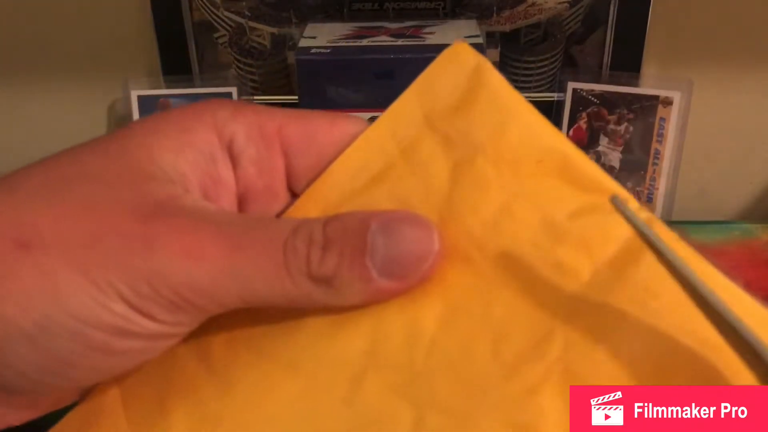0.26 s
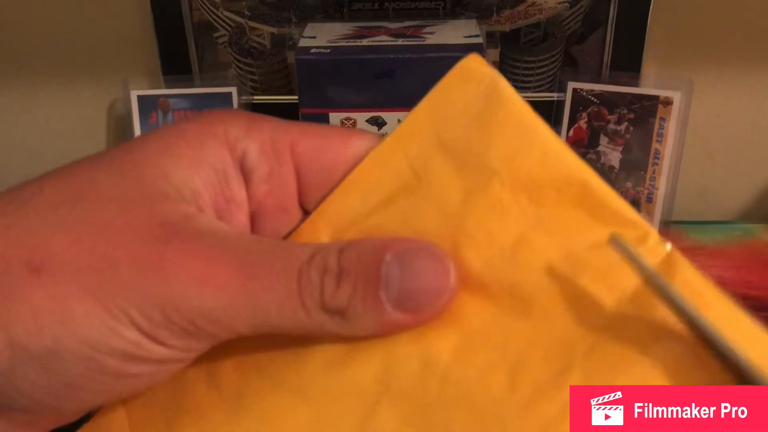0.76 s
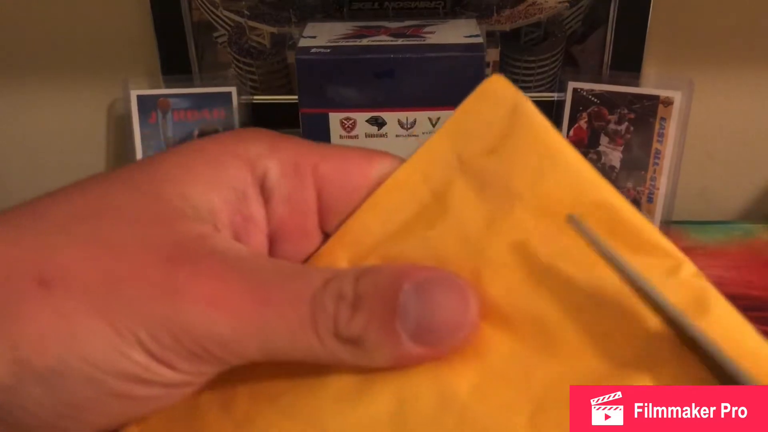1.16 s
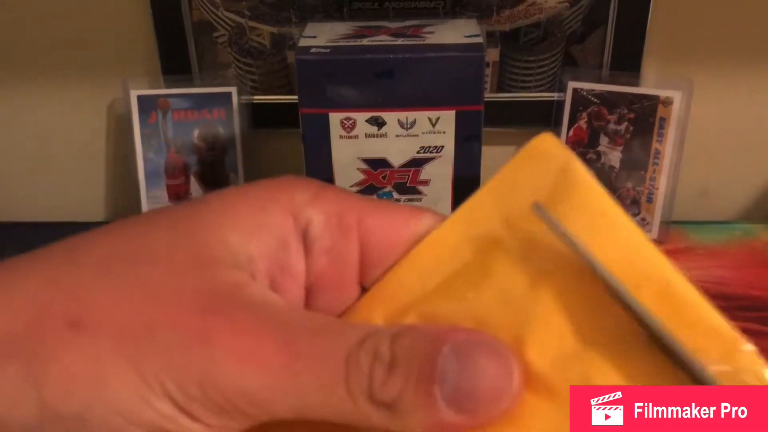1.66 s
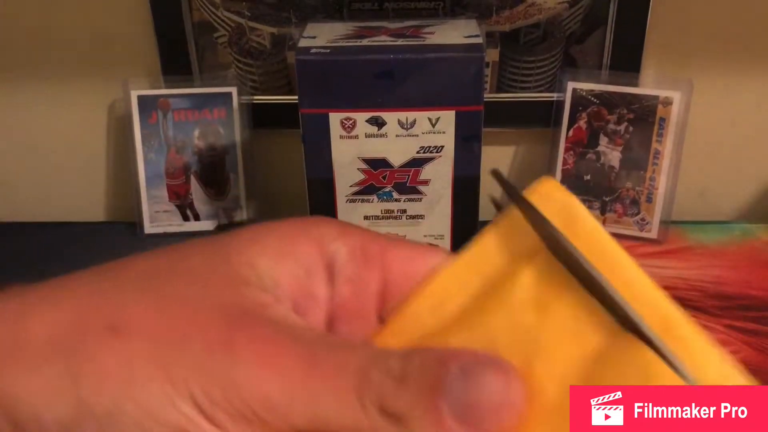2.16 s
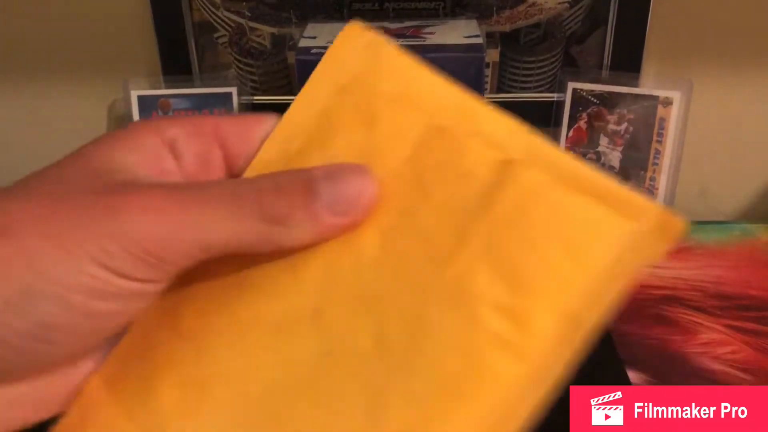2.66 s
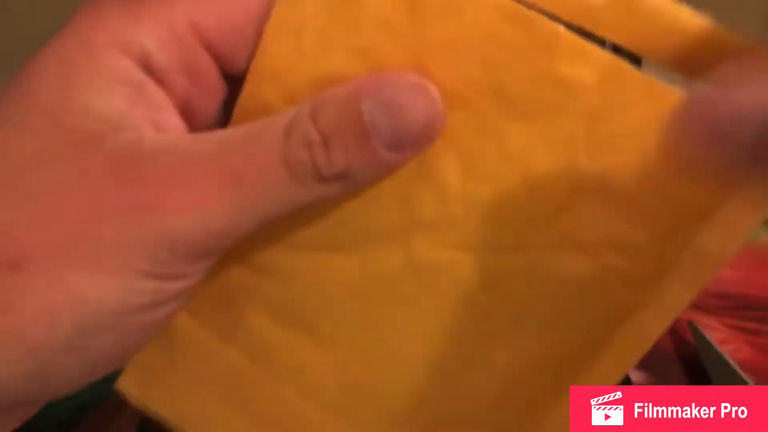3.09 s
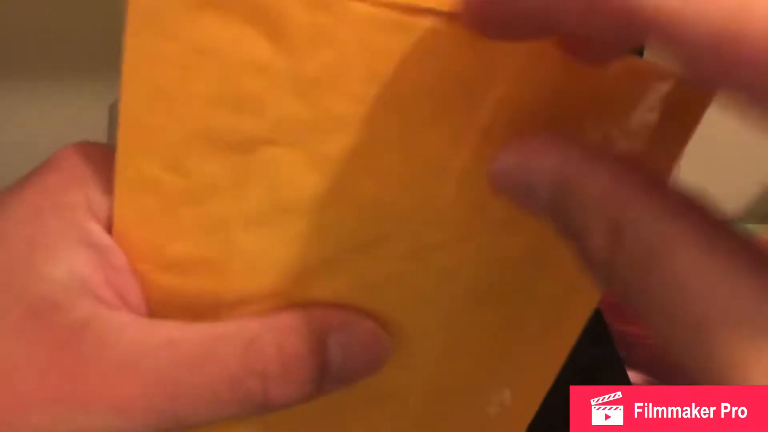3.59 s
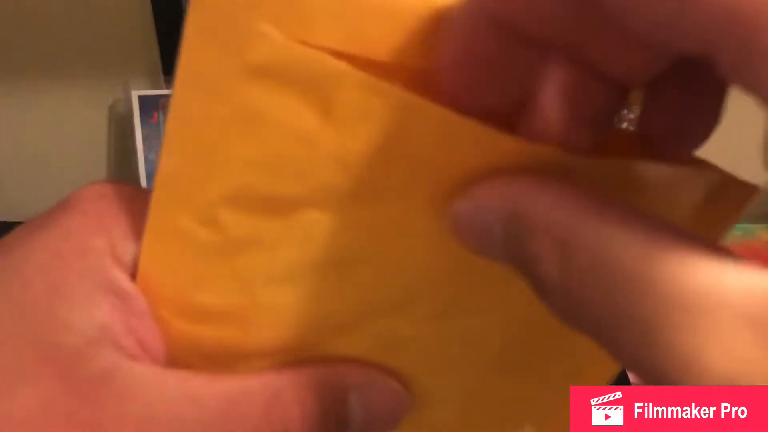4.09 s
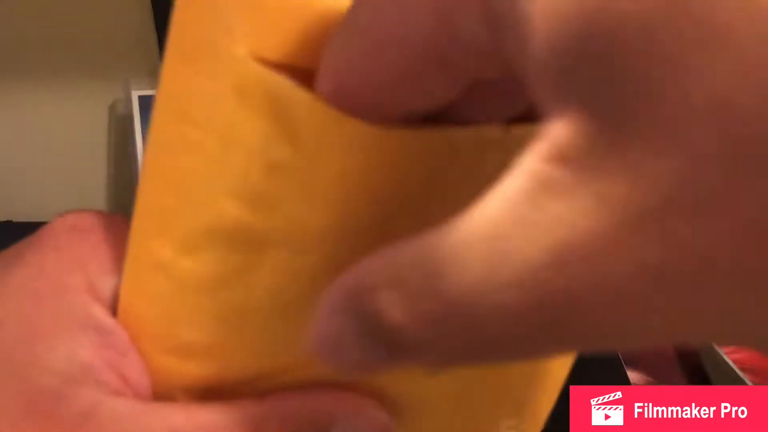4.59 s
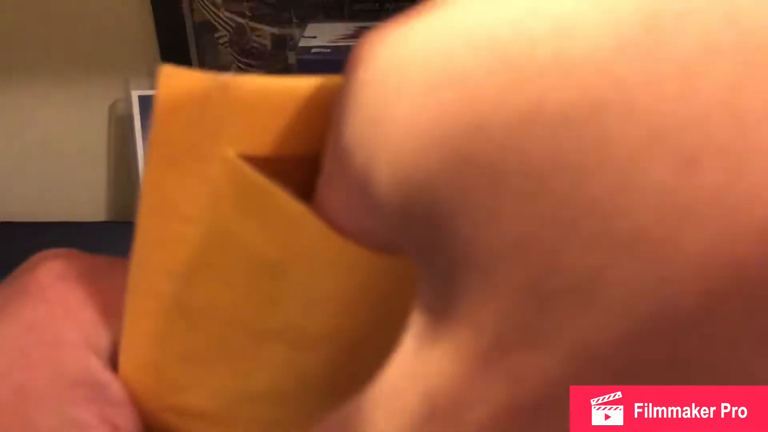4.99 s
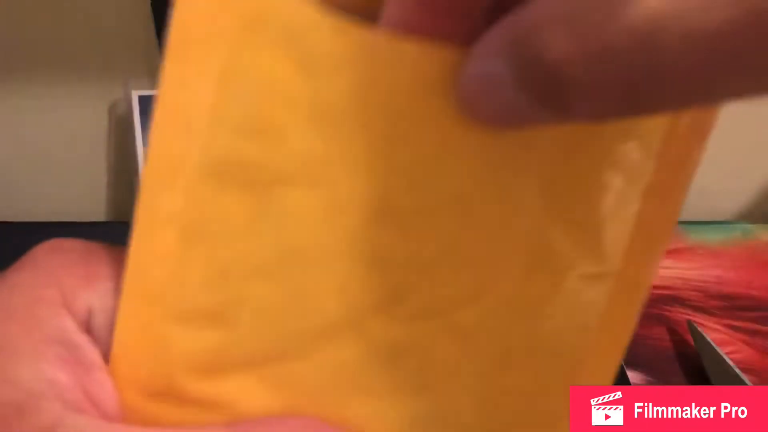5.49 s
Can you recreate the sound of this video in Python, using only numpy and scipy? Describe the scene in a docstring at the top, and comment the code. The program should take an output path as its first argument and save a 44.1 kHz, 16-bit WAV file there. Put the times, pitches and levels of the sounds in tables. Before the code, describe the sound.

Short scratchy scissor strokes cut a paper mailer, followed by a clunk on the table and close paper rustling over a faint hum.

```python
"""A scissor blade saws along the edge of a padded paper mailer in short strokes, heard from close by.
Stick-slip friction on the fibres makes the rasp, and creases snap as they buckle or give way.
The scissors clatter onto the table, exciting its damped modes; fingers then pry the slit open and
slide inside, crinkling the paper and flexing the padding. A faint mains hum fills the small room."""
import sys
import numpy as np
from scipy import signal
from scipy.fft import rfft, irfft, next_fast_len
from scipy.io import wavfile
from scipy.ndimage import uniform_filter1d, map_coordinates

SR = 44100
rng = np.random.default_rng(int(sys.argv[2]) if len(sys.argv) > 2 else 0)


def master_out(mix):
    """Clip the mix to full scale and print it as 16-bit PCM to the path in sys.argv[1]."""
    frames = np.transpose(np.atleast_2d(mix))
    ceiling = np.clip(frames, -1, 1)
    pcm = np.round(ceiling * 32767).astype(np.int16)
    wavfile.write(sys.argv[1], SR, pcm)


N = 253530


def amp(db):
    """Amplitude ratio of a level in decibels."""
    return 10 ** (np.asarray(db) / 20)


def unit(x):
    """Normalisation to rms 1."""
    return x / np.sqrt(np.mean(x ** 2) + 1e-20)


def along(points, hz):
    """Interpolation of (frequency [Hz], value) points on a logarithmic frequency axis."""
    f, v = np.transpose(points)
    return np.interp(np.log(hz + 1), np.log(f + 1), v)


def wobble(rate):
    """Smooth random modulation: a spline through `rate` knots a second."""
    return map_coordinates(rng.standard_normal(int(N * rate / SR) + 4), [np.arange(N) * rate / SR])


def filtered(x, response):
    """Linear filtering: the spectrum is multiplied by a frequency response."""
    size = next_fast_len(N + 8192)
    return irfft(rfft(x, size) * response(np.fft.rfftfreq(size, 1 / SR)), size)[:N]


def coloured(x, spectrum):
    """Spectral shaping, normalised to rms 1."""
    return unit(filtered(x, lambda hz: amp(along(spectrum, hz))))


def band(x, edges_hz, order=3):
    """Causal Butterworth band-pass."""
    return signal.sosfilt(signal.butter(order, edges_hz, 'band', fs=SR, output='sos'), x)


def add(track, start, sound):
    """Superposition of a sound on a track from `start` seconds."""
    part = track[round(start * SR):][:len(sound)]
    part += sound[:len(part)]


def stroke_gains(strokes, contact, attack_s, release_s, contact_body_db, contact_hiss_db):
    """Incoherent addition: strokes and light contact sum in power, giving body, rasp and hiss gains."""
    contact_db = np.interp(np.arange(N) / SR, *np.transpose(contact), left=-120, right=-120)
    power = np.outer(amp([contact_body_db, 0, contact_hiss_db]), amp(contact_db)) ** 2
    for start, length_s, db, swell_db, body_db, hiss_db in strokes:
        age = np.arange(int((length_s + 0.2) * SR)) / SR
        bite = np.minimum(age / attack_s, 1)
        hold = amp(db + swell_db * (np.minimum(age / length_s, 1) - 0.5))
        release = np.exp(-np.maximum(age - length_s, 0) / release_s)
        for track, gain in zip(power, amp([body_db, 0, hiss_db])):
            add(track, start, (gain * bite * hold * release) ** 2)
    return np.sqrt(power)


def slips(per_s, scatter_db):
    """Shot noise: tiny catches of uneven size come at random, each shaking the sheet briefly."""
    sizes = amp(scatter_db * np.clip(rng.standard_normal(N), -2, 2)) * rng.choice([-1, 1], N)
    impulses = sizes * (rng.random(N) < per_s / SR)
    energy = signal.lfilter([1], [1, -np.exp(-1 / (0.00092 * SR))], impulses ** 2)
    shiver = np.sqrt(energy) * rng.standard_normal(N)
    return unit(unit(impulses) + unit(shiver))


def resonate(x, resonance, patchy_db):
    """Time-varying resonance: one broad peak moves with the point of contact; lesser ones come and go."""
    hz, t, spectra = signal.stft(x, SR, nperseg=512)
    times, *columns = np.transpose(resonance)
    centre_hz, peak_db = [np.interp(t, times, column) for column in columns]
    octaves = np.log2((hz[:, None] + 1) / centre_hz)
    patches = uniform_filter1d(rng.standard_normal(spectra.shape), size=4, axis=0)
    patches = uniform_filter1d(patches, size=4, axis=1)
    gain_db = peak_db / (1 + (octaves / 0.4) ** 2) + patchy_db * np.clip(unit(patches), -2, 2)
    return signal.istft(spectra * amp(gain_db), SR, nperseg=512)[1][:N]


# the paper's body, rasp and hiss bands: (lower edge [Hz], upper edge [Hz])
PAPER_BANDS = [(300, 1500), (1500, 5000), (5000, 17000)]
def friction(gains, colour, resonance, catches_per_s, crinkles_per_s, crinkle_db, slide_gain,
             judder_db, judder_per_s, flex_db, patchy_db):
    """Stick-slip friction: dense fibre catches and sparser crinkles over a hiss, as the sheet flexes."""
    catches = slips(catches_per_s, scatter_db=0.5)
    crinkles = amp(crinkle_db) * slips(crinkles_per_s, scatter_db=2.5)
    slide = slide_gain * rng.standard_normal(N)
    excitation = (catches + crinkles + slide) * amp(judder_db * wobble(judder_per_s))
    vibration = coloured(resonate(excitation, resonance, patchy_db), colour)
    body, rasp, hiss = [unit(band(vibration, edges, order=4)) for edges in PAPER_BANDS]
    flex = unit(band(rng.standard_normal(N), (160, 400)) * amp(7.7 * wobble(40)))
    sheet = unit((body + amp(flex_db) * flex) * amp(0.62 * wobble(90)))  # the sheet responds unevenly
    return (gains * [sheet, rasp, hiss]).sum(0)


# sawing strokes: (time [s], duration [s], rasp level [dB], swell [dB], body, hiss [dB re rasp])
BLADE_STROKES = [(0.245, 0.063, -48, 6.5, -6, -6.5), (0.321, .012, -52, 0, -5, -1),
                 (0.347, 0.015, -47.5, -23, 0, 1.5), (0.458, 0.045, -42.5, 0, -5, -8),
                 (0.556, 0.056, -42, 4.5, 0.5, -3), (0.716, 0.078, -48.5, -0.5, -2.5, -6),
                 (0.82, 0.071, -40.5, 7.5, -2, 0), (0.971, 0.084, -44, -3, -9, -2.5),
                 (1.083, 0.06, -38, 3, -3, 2), (1.228, 0.087, -38, -0.5, -2.5, -4),
                 (1.33, 0.063, -40.5, -6, 1.5, 2.5), (1.474, 0.081, -41.5, -0.5, -4, -2),
                 (1.58, 0.054, -37.5, -2, -1, 1.5), (1.721, 0.095, -39.5, 3, -1.5, -2),
                 (1.834, 0.042, -36, 0.5, -3.5, -2), (1.973, 0.088, -43, 5.5, 0, -3),
                 (2.07, 0.054, -34, 5, -7, -2), (2.218, 0.033, -48.5, -15, 0.5, 1.5),
                 (2.258, 0.046, -45, 8, -4.5, 0.5), (2.34, 0.036, -39, 10, -10, -0.5)]
# light contact between strokes: (time [s], rasp level [dB])
BLADE_TOUCH = [(0, -65.5), (0.25, -59.5), (0.55, -59), (1.2, -57), (1.7, -65.5), (2.299, -54.5),
               (2.6, -68.5), (3.05, -72)]
# spectrum of cutting: (frequency [Hz], relative level [dB])
CUT_SPECTRUM = [(200, 15.5), (300, -5), (450, -5.5), (750, -3), (1100, -6), (1500, -8.5), (2200, 3),
                (3200, 4.5), (4500, 0), (6500, -2), (9000, -4), (12000, -6), (16000, -9.5)]
# resonance of the free flap: (time [s], frequency [Hz], peak gain [dB])
FLAP_RESONANCE = [(0.3, 2900, 6), (0.48, 2160, 7), (0.6, 2020, 4), (0.86, 1800, 4), (1.02, 2900, 4.5),
                  (1.12, 5320, 1.5), (1.27, 4200, 2.5), (1.52, 3800, 1.5), (1.6, 5750, 3), (1.85, 4040, 3),
                  (2.04, 2290, 4.5), (2.11, 4400, 0.5), (2.29, 4050, 6), (2.37, 4400, 7.5),
                  (2.44, 3600, 8.5)]
def blade():
    """Forced vibration: the blade catches on fibres and drives the flap, whose resonance shifts."""
    gains = stroke_gains(BLADE_STROKES, BLADE_TOUCH, attack_s=0.012, release_s=0.011,
                         contact_body_db=-0.5, contact_hiss_db=-4)
    return friction(gains, CUT_SPECTRUM, FLAP_RESONANCE, catches_per_s=1800, crinkles_per_s=330,
                    crinkle_db=0, slide_gain=0.82, judder_db=1.96, judder_per_s=200,
                    flex_db=-16.5, patchy_db=3.5)


# tones of the mains hum: (frequency [Hz], rms level [dB])
HUM_TONES = [(120.7, -49), (60.4, -65), (172, -66)]
# low rush of the room: (frequency [Hz], relative level [dB])
RUSH_SPECTRUM = [(25, -25), (45, -18), (65, -9.5), (82, 4.5), (100, -2.5), (170, 0), (230, -9),
                 (450, -14.5), (1000, -29), (4000, -45), (16000, -48)]
def hum_and_rush():
    """Tones over broadband noise: mains hum, slightly phase-modulated, above the room's low rush."""
    t = np.arange(N) / SR
    hum = sum(amp(db) * np.sqrt(2) * np.sin(2 * np.pi * hz * t + 0.098 * wobble(3))
              for hz, db in HUM_TONES)
    return hum + amp(-51) * coloured(rng.standard_normal(N), RUSH_SPECTRUM)


# reverberation time of the room: (frequency [Hz], T60 [s])
ROOM_DECAY = [(150, 0.62), (460, 0.57), (1000, 0.36), (5000, 0.27), (15000, 0.3)]
def room(x):
    """Reverberation: diffuse wall reflections decay exponentially, the treble before the bass."""
    hz, t, spectra = signal.stft(rng.standard_normal(SR // 2), SR, nperseg=256)
    decay = amp(-60 * t / along(ROOM_DECAY, hz)[:, None])
    tail = signal.istft(spectra * decay, SR, nperseg=256)[1]
    response = np.pad(tail, (SR // 300, 0)) / np.linalg.norm(tail)
    return signal.fftconvolve(x, response)[:N]


def ticks(per_s=20, db=-52, t60_s=0.0096):
    """Random transients: the held mailer emits faint, quickly damped ticks."""
    out, t = np.zeros(N), np.arange(SR // 30) / SR
    for start in rng.uniform(0, N / SR, int(per_s * N / SR)):
        tick = unit(band(rng.standard_normal(len(t)), (1800, 9000), order=1))
        add(out, start, tick * amp(db - 60 * t / t60_s))
    return out


# paper giving way: (time [s], rasp level [dB], body, hiss [dB re rasp], crease frequency [Hz],
# energy share of the first crack [0-1])
CREASE_SNAPS = [(0.11, -57.5, -12, 3, 5000, 0.8), (0.1384, -65.5, -4, 17, 7600, .7),
                (0.1571, -47, -1.5, -4, 770, 0.17), (0.55, -45.5, -4, -7, 1510, .5),
                (0.5835, -43.5, -6, 1, 1330, 0), (0.7067, -54.5, -2, 3, 5030, 0.7),
                (0.8815, -22.5, -1, -4.5, 1810, 0.6), (0.98, -38, -26, -1, 2960, .6),
                (1.1611, -37.5, -11, 1.5, 8050, 0.4), (1.2956, -20.5, -8.5, -20, 3200, .8),
                (1.427, -57.5, 8.5, -12, 1270, 0.7), (1.5844, -39.5, 0.5, -2, 6380, 0.1),
                (1.7788, -25, -5, 2.5, 6000, 0.86), (1.8677, -22.5, 0, -5, 990, 0),
                (1.9069, -37.5, -10, -6, 3820, .1), (2.114, -39.5, 7.5, 3, 1420, 0.3),
                (2.2082, -56, -7, 12.5, 6320, .1), (2.3165, -47.5, 7, 4, 900, .3),
                (2.4222, -40, -5, -7, 3600, 0.2), (2.4583, -50, -12, -2, 5880, .7),
                (2.525, -53, -23, -19, 2850, 0.83), (2.567, -54, -19, -17, 3260, 0.9),
                (2.678, -54.5, -16, -12, 3360, 0.2), (3.0934, -36.5, -1.5, -6, 3510, 0.44),
                (3.124, -32, -10.5, -13, 4240, 0.25), (3.3363, -45, -17, 3, 4950, .2),
                (3.5107, -54, -2, -2, 4200, 0.6), (3.5433, -46, -7, -1, 3640, 0.14),
                (3.7582, -37, -4, -2.5, 6650, 0.05), (3.8657, -51.5, 6.5, 3, 1230, 0.65),
                (3.877, -49, -12, 4, 8000, .7), (3.9514, -42.5, 2.5, -2, 3920, .5),
                (3.966, -43, -7, 1, 6000, .3), (4.0492, -35, -20, -4, 5080, 0.25),
                (4.1141, -39, -9, -5, 3470, .3), (4.185, -23.5, -8.5, -7, 3600, 0.02),
                (4.2192, -32, -8, -9, 5370, 1), (4.236, -36, -15, -6, 3220, 0),
                (4.2722, -42.5, 11, -4, 1450, .4), (4.2833, -40, 0, 3.5, 1380, 0.75),
                (4.2942, -31, -4, -11, 2920, 0.9), (4.3524, -39, 0.5, -15, 1600, 0.1),
                (4.3986, -40, -25, 7.5, 5570, .4), (4.5566, -31.5, -5.5, 4.5, 9250, 0.84),
                (4.7873, -30.5, -6.5, -3, 4180, 0.25), (4.8037, -22, -13, -8, 3030, 0.18),
                (4.8164, -22, -5.5, -1.5, 2150, 0), (4.9121, -39, -2.5, -2, 6000, 0.3),
                (5.0995, -39, -2.5, -6, 1420, 0.37), (5.147, -50.5, -4, 8.5, 11750, 1),
                (5.175, -44, 2.5, -4, 1400, .3), (5.363, -48.5, 11, -14, 1420, 0.7),
                (5.4964, -51.5, 6, 8, 11200, 0.99), (5.6659, -31.5, -7, -6, 2780, 0.33)]
def snaps():
    """Buckling: a crease releases a sharp crack and a brief rattle, both coloured by its resonance."""
    out, t = np.zeros(N), np.arange(SR // 20) / SR
    span_gain = np.sqrt(0.008 * SR / len(t))  # levels refer to the energy spread over 8 ms
    for start, db, body_db, hiss_db, hz, share in CREASE_SNAPS:
        crack, rattle = rng.standard_normal((2, len(t)))
        crack = unit(crack * amp(-60 * t / 0.0014))
        rattle = unit(rattle * amp(-60 * t / 0.019) * (1 - np.exp(-t / 0.0005)))
        pop = band(np.sqrt(share) * crack + np.sqrt(1 - share) * rattle, (650, 9000), order=1)
        pop += 1.44 * signal.lfilter(*signal.iirpeak(hz, Q=3, fs=SR), pop)
        gains = amp([body_db, 0, hiss_db])
        parts = [gain * unit(band(pop, edges)) for gain, edges in zip(gains, PAPER_BANDS)]
        add(out, start, amp(db) * span_gain * sum(parts))
    return out


# scissors striking the table: (time [s], thud level [dB], knock level [dB], steel tick level [dB])
SCISSOR_IMPACTS = [(2.756, -24, -30.5, -38), (2.793, -19, -19, -25), (2.809, -14, -26, -54),
                   (2.813, -22, -9, -20), (2.851, -42, -24, -34.5), (2.861, -24.5, -31, -61),
                   (2.884, -23, -32, -40.5), (2.915, -30, -39, -58), (2.94, -25.5, -23, -34),
                   (2.955, -31, -22, -43), (2.986, -37, -37, -52)]
# modes of the table top: (frequency [Hz], relative level [dB], T60 [s])
TABLE_MODES = [(133.8, -8.5, 0.24), (157, 1.5, 0.1), (188.4, -7, 0.11), (229, -11, 0.049),
               (320, -5.5, 0.021), (391, -6, 0.041), (455, -3.5, 0.04), (635, -8.5, 0.022),
               (710, -5.5, 0.025), (804, -10, .025), (982, -7, 0.031), (1112, -10.5, 0.027),
               (1215, -3, 0.014)]
def scissors_landing():
    """Modal impact: the rocking scissors' weight thuds in the low modes; their edges knock the higher."""
    out, t = np.zeros(N), np.arange(SR // 4) / SR
    hz, mode_db, t60 = np.transpose(TABLE_MODES)[:, :, None]
    onset = 1 - np.exp(-t / 0.0013)
    for start, thud_db, knock_db, tick_db in SCISSOR_IMPACTS:
        scatter_db, phase_scatter = rng.standard_normal((2, len(TABLE_MODES), 1))
        level_db = mode_db + np.where(hz < 300, thud_db, knock_db) + scatter_db
        modes = amp(level_db - 60 * t / t60) * np.sin(2 * np.pi * hz * t + 0.5 * phase_scatter)
        steel = unit(band(rng.standard_normal(len(t)), (1300, 2900), order=1))
        add(out, start, modes.sum(0) * onset + steel * amp(tick_db - 60 * t / 0.014))
    return band(out, (100, 15000))  # a small board radiates no deep bass


# finger slides: (time [s], duration [s], rasp level [dB], swell [dB], body, hiss [dB re rasp])
FINGER_STROKES = [(3.058, 0.031, -51.5, -3, -7, 5), (3.088, 0.064, -43, -6.5, 0.5, -1),
                  (3.205, 0.053, -64.5, 0, -6, 7.5), (3.26, 0.034, -44.5, -4, 1, 5),
                  (3.33, 0.09, -52.5, 2.5, -0.5, -0.5), (3.54, 0.059, -56.5, 2, -4, 1.5),
                  (3.705, 0.31, -59.5, -2, -4, 3), (3.741, 0.024, -50.5, 1, 6, 6),
                  (3.945, 0.03, -44, -7, -4, 6.5), (3.985, 0.2, -50.5, 2, -5.5, 6.5),
                  (4.014, 0.034, -45, -17, 4.5, -5), (4.175, 0.11, -44, -4, -5.5, 1),
                  (4.338, 0.072, -42, 6, -5, 3), (4.42, 0.35, -47.5, -4, -4.5, 1),
                  (4.825, 0.12, -47, 2.5, -2.5, -2), (5.098, 0.27, -47, -1, -2, 0),
                  (5.38, 0.11, -50.5, -6, -4.5, -5.5), (5.665, 0.077, -46, -8, -6.5, -5)]
# light contact between slides: (time [s], rasp level [dB])
FINGER_TOUCH = [(3.0, -77), (3.17, -56.5), (3.65, -72), (4.3, -46.5), (4.949, -54.5), (5.02, -53.5),
                (5.5, -54), (5.63, -58), (5.75, -44)]
# spectrum of rubbing: (frequency [Hz], relative level [dB])
RUB_SPECTRUM = [(200, 20.5), (300, 4), (450, -2), (700, -4.5), (1000, -5.5), (1500, -6.5), (2200, -3),
                (3200, -4.5), (4500, -7), (6500, -4), (9000, -6), (12000, -7.5), (16000, -10)]
# resonance of the pocket: (time [s], frequency [Hz], peak gain [dB])
POCKET_RESONANCE = [(3.1, 3340, 6.5), (3.8, 3380, 9), (4.2, 3700, 3.5), (4.4, 5430, 1), (4.65, 3600, 4),
                    (5.3, 3000, 1), (5.7, 2930, 2.5)]
def fingers():
    """Sliding friction: fingers rub and flex the paper, shifting the pocket's resonance as they enter."""
    gains = stroke_gains(FINGER_STROKES, FINGER_TOUCH, attack_s=0.013, release_s=0.014,
                         contact_body_db=-4, contact_hiss_db=-4)
    return friction(gains, RUB_SPECTRUM, POCKET_RESONANCE, catches_per_s=800, crinkles_per_s=110,
                    crinkle_db=-1, slide_gain=1.0, judder_db=1.85, judder_per_s=68,
                    flex_db=-5.5, patchy_db=2.0)


# padded wall flexing under the fingers: (time [s], level [dB], frequency [Hz])
PADDING_BUMPS = [(3.091, -30, 278), (3.224, -30, 263), (3.286, -26.5, 205), (3.335, -28, 215),
                 (3.761, -27, 265), (3.949, -33, 430), (4.049, -23.5, 210), (4.185, -26.5, 278),
                 (4.272, -29, 450), (4.346, -25, 410), (4.378, -29, 377), (4.787, -29.5, 344),
                 (4.899, -30, 403), (5.098, -31, 452), (5.12, -33, 480), (5.663, -31.5, 182)]
def padding_bumps(t60_s=0.033, attack_s=0.0025):
    """Damped oscillation: the padding gives with a soft, short note and a dull scuff."""
    out, t = np.zeros(N), np.arange(SR // 8) / SR
    for start, db, hz in PADDING_BUMPS:
        scuff = unit(band(rng.standard_normal(len(t)), (220, 1100), order=1))
        push = 1.16 * np.sin(2 * np.pi * hz * t) + 0.47 * band(scuff, (120, 1800), order=2)
        add(out, start, amp(db - 60 * t / t60_s) * (1 - np.exp(-t / attack_s)) * push)
    return out


def scene():
    """Superposition: direct sound of paper and table, their reverberation, and the room's background."""
    paper = blade() + fingers() + snaps() + padding_bumps() + ticks()
    table = scissors_landing()
    reverberation = room(amp(-21) * paper + amp(-15) * table)
    return (paper + table + reverberation + hum_and_rush())[None]


def record(dry):
    """Band limiting: an ideal low-pass removes everything above 16 kHz."""
    return filtered(dry[0], lambda hz: hz < 16000)[None]


dry = scene()
out = record(dry)
master_out(out)
```